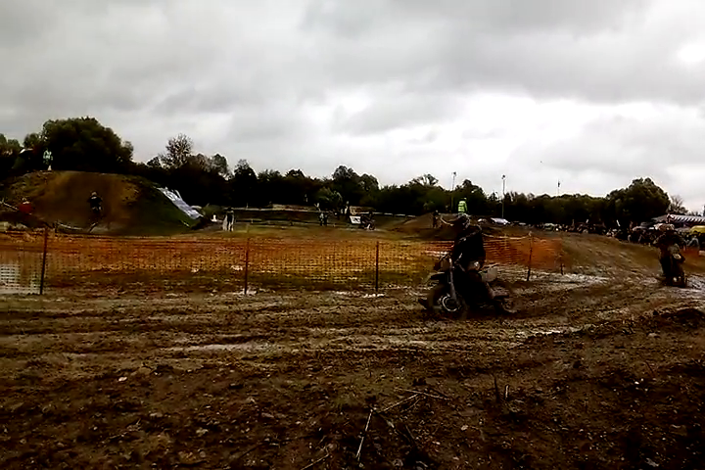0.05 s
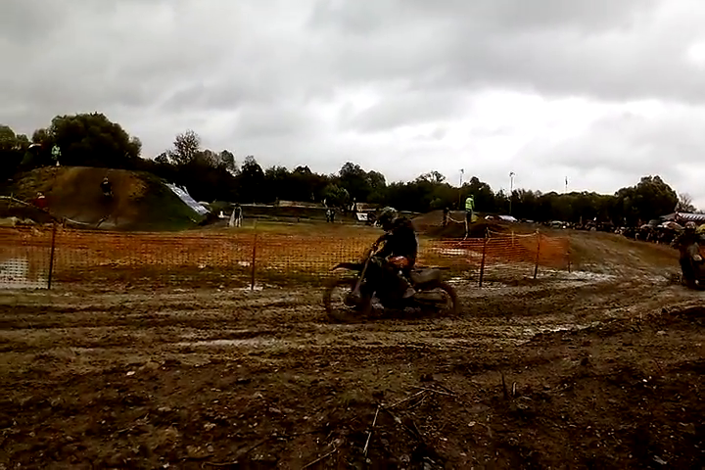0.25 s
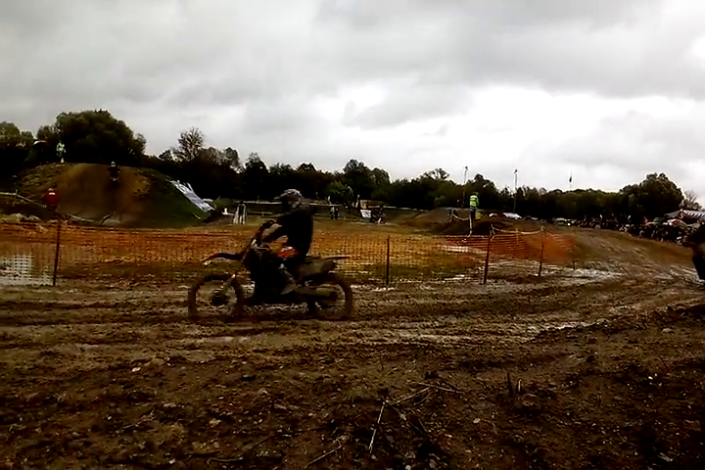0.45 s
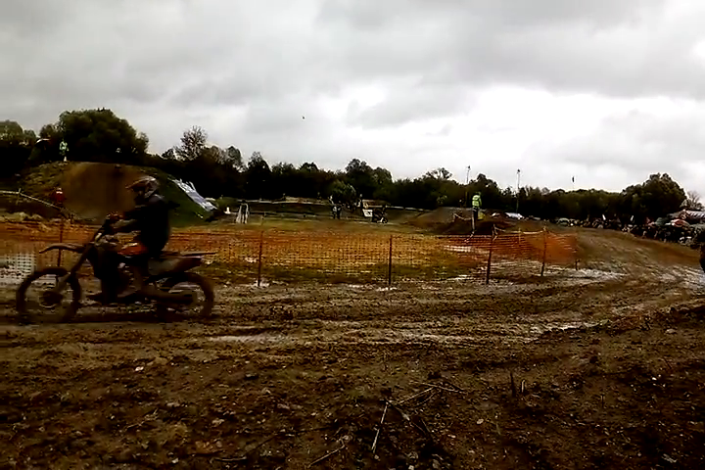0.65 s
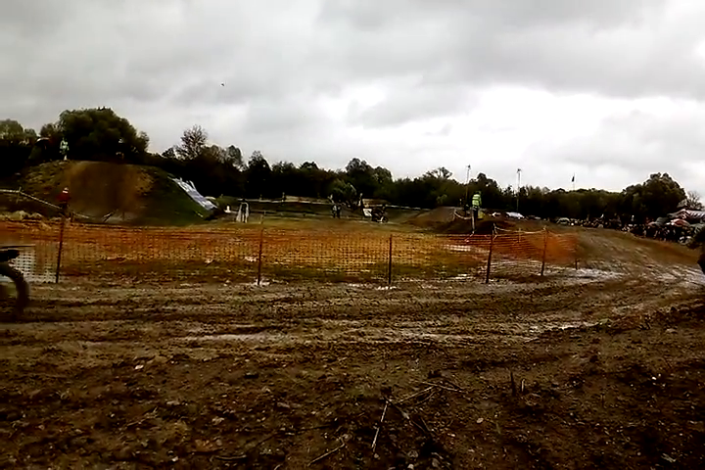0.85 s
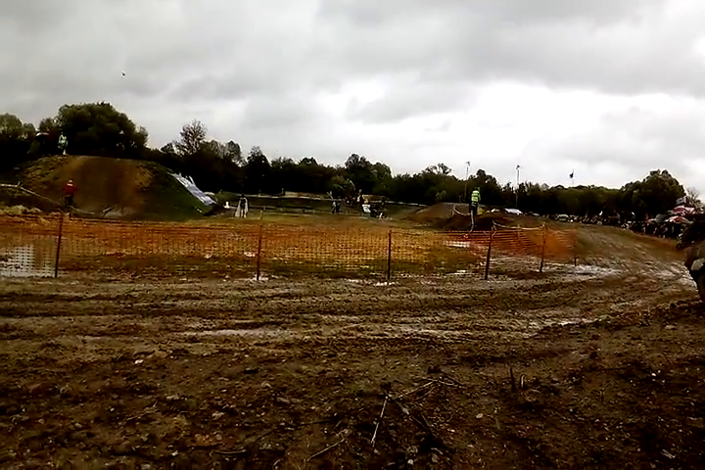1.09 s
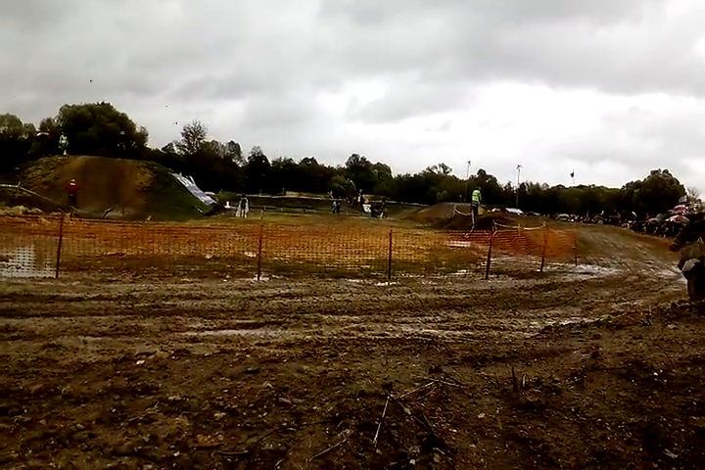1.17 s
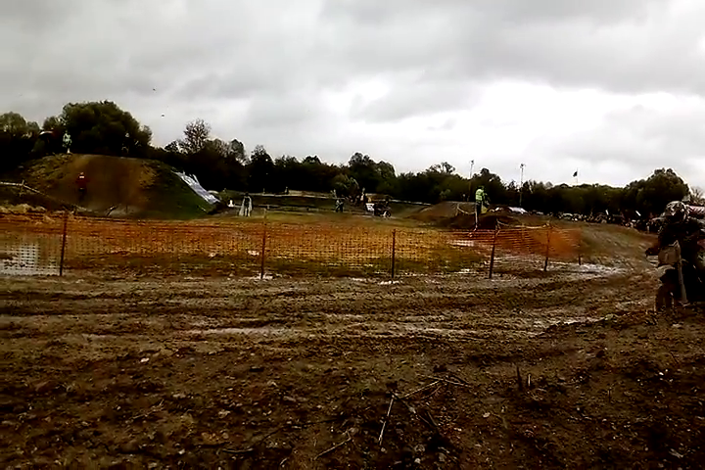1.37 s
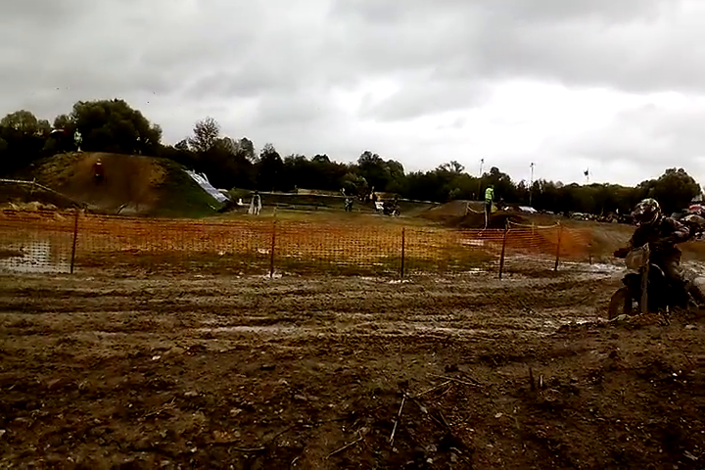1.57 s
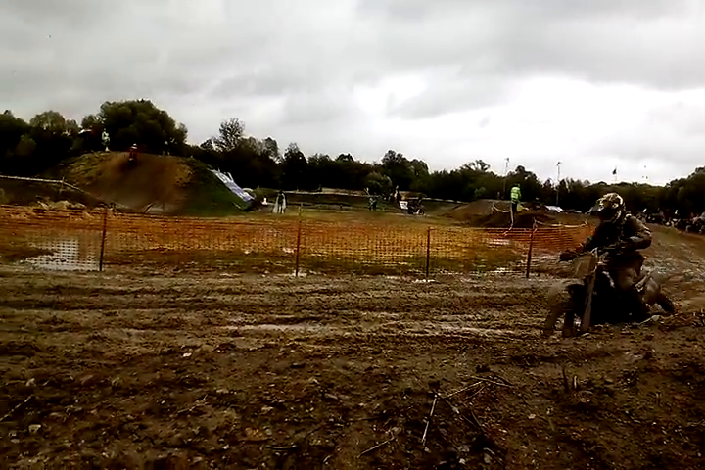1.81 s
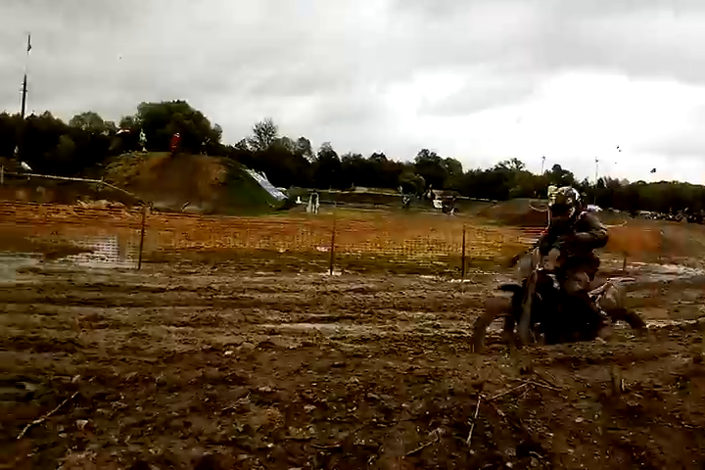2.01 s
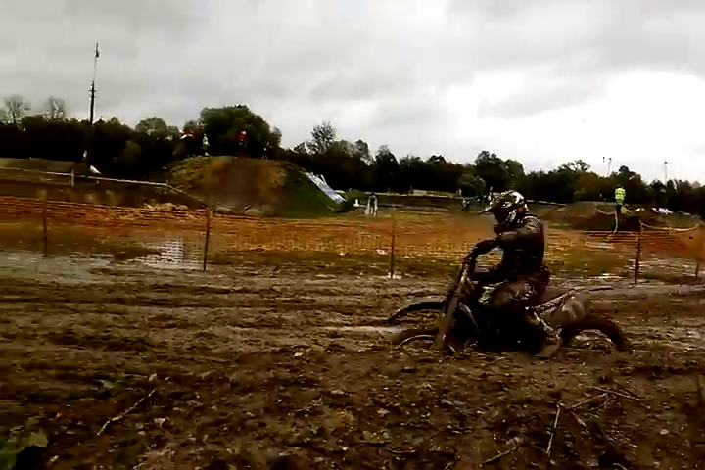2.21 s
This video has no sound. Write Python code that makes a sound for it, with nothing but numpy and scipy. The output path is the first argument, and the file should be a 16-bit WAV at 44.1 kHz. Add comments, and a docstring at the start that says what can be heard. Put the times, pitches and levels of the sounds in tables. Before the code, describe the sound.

Single-cylinder motocross bike roars by and shuts off, followed by another bike's two raspy revs

```python
"""Two single-cylinder dirt bikes on a muddy track. The first drives past close to the microphone and shuts
its throttle; the second comes out of the bend with two blips. Every firing sends out a sharp bark, a low
boom of the silencer and a puff of rasping gas (shaped noise), and the ground and the bikes scatter them.
A bike putters far off, perhaps the second still at a distance, its pulses dulled and smeared; chains and
tyres hiss faintly, and stirred air rumbles on the microphone: both are filtered noise."""
import sys
import numpy as np
from scipy import signal
from scipy.fft import rfft, irfft, next_fast_len
from scipy.io import wavfile
from scipy.ndimage import uniform_filter1d

SR = 44100
rng = np.random.default_rng(int(sys.argv[2]) if len(sys.argv) > 2 else 0)


def to_wav(sig):
    """Store sig (one row per channel, or 1-D mono) as 16-bit WAV at the path in sys.argv[1].

    Samples outside -1..1 are clipped; the rate is SR.
    """
    pcm = np.clip(np.atleast_2d(sig), -1, 1) * 32767
    pcm = np.round(pcm).astype(np.int16)
    wavfile.write(sys.argv[1], SR, pcm.T)  # frames by channels


N = 99225


def amp(db):
    """Decibels to gain."""
    return 10 ** (np.asarray(db) / 20)


def unit(x):
    """Scale to rms 1."""
    return x / np.sqrt(np.mean(x ** 2) + 1e-20)


def curves(rows):
    """One value per sample for each column after the time."""
    s, *cols = np.transpose(rows)
    return [np.interp(np.arange(N) / SR, s, c) for c in cols]


def filtered(x, response):
    """Multiply the spectrum of x by a complex response of frequency."""
    m = 2 * next_fast_len(N // 2 + 8192)
    return irfft(rfft(x, m) * response(np.fft.rfftfreq(m, 1 / SR)), m)[..., :N]


def coloured(x, points):
    """Causal minimum-phase filter through (frequency [Hz], level [dB]) points."""
    def response(hz):
        f, db = np.transpose(points)
        gain = amp(np.interp(np.log(hz + 1), np.log(f + 1), db))
        # folding the cepstrum onto positive times gives the minimum phase
        cep = irfft(np.log(gain))
        cep[1:len(cep) // 2] *= 2
        cep[len(cep) // 2 + 1:] = 0
        return np.exp(rfft(cep))
    return filtered(x, response)


def blend(sounds, moments):
    """Cross-fade sounds, each at its full strength at its moment."""
    t = np.arange(N) / SR
    moments = np.sort(moments)
    return sum(x * np.interp(t, moments, w) for x, w in zip(sounds, np.eye(len(sounds))))


def firings(speed, span, scatter_db, jitter_s):
    """One impulse per firing, each a little different in strength and timing."""
    t = np.arange(N) / SR
    turns = np.cumsum(curves(speed)[0]) / SR  # firings since the start
    first, last = np.interp(span, t, turns)
    times = np.interp(np.arange(first, last), turns, t)
    chance = rng.standard_normal((len(times), 2))
    jittered = times + jitter_s * chance[:, 0]
    at = np.clip(np.round(jittered * SR).astype(int), 0, N - 1)
    return np.bincount(at, amp(scatter_db * chance[:, 1]), N)


def scatter(x, decay_s, count=14):
    """Reflections from ruts and machine: alike for neighbouring firings, changing as the bike moves."""
    t = np.arange(SR // 20) / SR
    tails = rng.standard_normal((count, len(t))) * np.exp(-t / decay_s) * (t > .001)
    tails /= np.linalg.norm(tails, axis=1, keepdims=True)
    reflected = signal.fftconvolve(x[None], tails, axes=1)[:, :N]
    return unit(blend(reflected, np.linspace(0, N / SR, count))) * np.std(x)


def puffs(pulses, rise_s, decay_s, tail_db, tail_s):
    """A burst of turbulence with a longer tail for each impulse, equal to it in energy."""
    t = np.arange(SR // 16) / SR
    fall = np.exp(-t / decay_s) + amp(tail_db) * np.exp(-t / tail_s)
    shape = (1 - np.exp(-t / rise_s)) * fall
    envelope = signal.fftconvolve(pulses, shape / np.linalg.norm(shape))[:N]
    return envelope * rng.standard_normal(N)


def echo(x, delay_s, gain):
    """The pressure wave plus its reflection inside the exhaust."""
    return filtered(x, lambda f: 1 + gain * np.exp(-2j * np.pi * f * delay_s))


def pipe(x, modes, delay_s, high_hz=430):
    """The silencer's low resonances, which sound a moment after the bark."""
    def response(f):
        # each mode: centre c and width w in Hz
        modal = sum(amp(db) * 1j * f * w / (c * c - f * f + 1j * f * w) for c, w, db in modes)
        return np.exp(-2j * np.pi * f * delay_s) * modal
    high_cut = signal.butter(2, high_hz, fs=SR, output="sos")
    return signal.sosfilt(high_cut, filtered(x, response))


def steady(x, span, size=2400):
    """Bring a pulse train to a running rms of 1 over its span."""
    t = np.arange(N) / SR
    on = 1. * ((t > span[0]) & (t < span[1]))

    def smooth(v):
        return np.abs(uniform_filter1d(uniform_filter1d(v, size), size))

    power = smooth(on * x * x) + 1e-6 * np.mean(x * x)
    return x * np.sqrt((smooth(on) + 1e-6) / power)


def exhaust(layers, level, span, trims_db, low_hz=102):
    """Boom, bark and rasp at their levels; the small outlet radiates no deep bass."""
    low_cut = signal.butter(N=7, Wn=low_hz, btype="high", fs=SR, output="sos")
    total = 0
    for x, db, trim in zip(layers, curves(level), trims_db):
        total = total + amp(db + trim) * steady(signal.sosfilt(low_cut, x), span)
    return total


def track_noise():
    """Chains, tyres and the far field: steady coloured noise, faint at the microphone."""
    # colour of the noise: (frequency [Hz], relative level [dB])
    track_colour = [(25, -15), (70, -21), (130, 25.5), (300, 15), (450, 7.5), (750, 7), (1300, 4.5),
                    (2000, -5), (3000, -25), (4500, -9), (5700, -5.5), (6700, -7.5), (7400, -18.5),
                    (8200, -79.5)]
    return amp(-48.5) * unit(coloured(rng.standard_normal(N), track_colour))


def far_bike():
    """A bike at a distance: pulses smeared by strong scatter and dulled into a putter."""
    # engine speed: (time [s], firing rate [1/s])
    far_speed = [(0, 50.5), (.5, 53), (1.3, 52), (2.25, 74)]
    # level at the microphone: (time [s], level [dB])
    far_level = [(0, -52), (.3, -31), (.6, -39.5), (1.2, -43), (1.35, -58), (1.8, -57.5), (2.18, -50),
                 (2.25, -45.5)]
    # dull distant bark: (frequency [Hz], relative level [dB])
    far_colour = [(80, -50.5), (160, 2), (260, 0.5), (430, -7.5), (560, 4.5), (800, 0.5), (1200, -4),
                  (1700, -17), (2600, -66)]
    # the engine fires throughout: (first, last moment [s])
    whole_span = (0, 2.25)
    pulses = firings(far_speed, whole_span, scatter_db=1.0, jitter_s=.0001)
    smeared = pulses + amp(5.5) * scatter(pulses, decay_s=0.0084)
    return amp(curves(far_level)[0]) * unit(coloured(smeared, far_colour))


def wake():
    """Air stirred by a close bike rumbles on the microphone: low noise, strongest at 1 s."""
    # rumble: (time [s], level [dB])
    wake_level = [(0, -60), (.45, -63), (.52, -48), (.85, -49.5), (1.0, -30), (1.1, -48), (1.3, -70),
                  (1.45, -60), (1.56, -66), (1.8, -61), (2.25, -73)]
    # stirred air: (frequency [Hz], relative level [dB])
    wake_colour = [(20, 13.5), (40, -5), (90, 7.5), (130, 12), (300, -76.5)]
    return amp(curves(wake_level)[0]) * unit(coloured(rng.standard_normal(N), wake_colour))


def passing_bike():
    """The exhaust of the close bike changes colour as it shows its front, side and rear."""
    # engine speed: (time [s], firing rate [1/s])
    speed = [(0, 60.5), (.095, 60.5), (.125, 53), (.22, 50.3), (.42, 48), (.521, 49.85), (.573, 57.55),
             (.625, 53.28), (.754, 55.1), (.779, 52.08), (.908, 55.2), (1.037, 72.91), (1.089, 74.07),
             (1.141, 64.32), (1.347, 57.75)]
    # when it is heard: (first, last moment [s])
    span = (.0054, 1.38)
    # exhaust before trims: (time [s], boom level [dB], bark level [dB], rasp level [dB])
    level = [(0.02, -47.5, -37, -62), (0.034, -47.5, -34.5, -67), (0.082, -46, -36, -52.5),
             (0.198, -47.5, -27.5, -43.5), (0.44, -34.5, -32.5, -51.5), (0.47, -37.5, -26.5, -41.5),
             (0.53, -20.5, -20, -36.5), (0.818, -21, -19.5, -43), (1.0, -22.5, -16.5, -39),
             (1.138, -25, -26.5, -46), (1.194, -23, -25, -76.5), (1.266, -44.5, -42.5, -64),
             (1.276, -48, -52, -57), (1.306, -47, -50, -89), (1.352, -47, -59, -96), (1.36, -68, -55, -69)]
    # bark from the front, the side, behind and moving away: (frequency [Hz], relative level [dB])
    bark_front = [(150, -25.5), (400, 4.5), (550, 1.5), (800, 4.5), (1150, 9.5), (1400, -10), (1800, -23.5),
                  (2500, -47.5), (5000, -57.5)]
    bark_side = [(150, -30), (380, -9.5), (500, 1.5), (680, -4.5), (900, -1), (1200, 1.5), (1600, -1),
                 (2050, -25), (3000, -27), (6000, -53)]
    bark_behind = [(150, -36), (440, -20.5), (545, 8), (610, 0), (710, 8.5), (790, 0.5), (900, -2.5),
                   (1170, -4.5), (1400, -6), (1620, 2), (2100, -17.5), (3200, -25.5), (6000, -76)]
    bark_away = [(150, -27.5), (370, -13), (450, -19.5), (540, -13), (680, -7), (880, 2), (1080, 1.5),
                 (1230, 7.5), (1400, -1), (1700, -9.5), (2200, -19), (3500, -19.5), (6000, -69)]
    # moments of the front, side, side, rear and far rear view: (time [s])
    bark_turns = [.38, 0.539, 0.759, 0.958, 1.138]
    # silencer from the side, the rear and drawing away: (frequency [Hz], width [Hz], relative level [dB])
    side_pipe = [(145.8, 16, -9), (210, 28, 4), (323, 47, -9)]
    rear_pipe = [(144.7, 30, 3), (215, 69, -2.5), (301, 23, -13)]
    away_pipe = [(130, 55, -13), (202, 50, 0.5), (310, 18, 0)]
    # moments of the side, rear, rear and far rear view: (time [s])
    pipe_turns = [.9, 1.0, 1.08, 1.17]
    # rasp from the front, the side and behind: (frequency [Hz], relative level [dB])
    rasp_front = [(1000, -10), (1900, 2), (2600, -22.5), (3300, -4), (4300, -1), (5200, 2), (5800, -11),
                  (6600, 0.5), (7400, -15.5), (8200, -52), (10500, -56.5)]
    rasp_side = [(1000, -21.5), (2000, -8), (2700, -1), (3800, -4.5), (5000, 1.5), (5800, -8), (6700, 3),
                 (7400, -14.5), (8200, -79.5), (9500, -25.5), (10500, -40)]
    rasp_behind = [(1000, -12), (2000, -0.5), (2800, -1.5), (3800, 2), (5000, -3), (5800, -5), (6700, -2),
                   (7400, -18), (8200, -48), (10500, -54.5)]
    # moments of the front, side, side and rear view: (time [s])
    rasp_turns = [.42, .52, .76, .98]

    pulses = firings(speed, span, scatter_db=1.02, jitter_s=.00006)
    blast = echo(pulses, delay_s=0.00153, gain=0.19)
    blast = blast + amp(-7.5) * scatter(pulses, decay_s=0.0052)
    blast = blast + amp(-4.5) * puffs(pulses, rise_s=0.00074, decay_s=0.0009, tail_db=-12.5, tail_s=0.013)
    barks = (bark_front, bark_side, bark_behind, bark_away)
    front, side, behind, away = (coloured(blast, c) for c in barks)
    bark = blend([front, side, side, behind, away], bark_turns)

    push = pulses + amp(-9) * puffs(pulses, rise_s=0.0012, decay_s=0.0076, tail_db=-4, tail_s=0.024)
    near, rear, far = (pipe(push, modes, delay_s=0.0017) for modes in (side_pipe, rear_pipe, away_pipe))
    boom = blend([near, rear, rear, far], pipe_turns)

    uneven = pulses * amp(3.0 * rng.standard_normal(N))  # gas varies more than the bark
    gas = puffs(uneven, rise_s=0.00099, decay_s=0.0015, tail_db=-15.5, tail_s=.018)
    front, side, behind = (unit(coloured(gas, c)) for c in (rasp_front, rasp_side, rasp_behind))
    rasp = blend([front, side, side, behind], rasp_turns)
    return exhaust([boom, bark, rasp], level, span, trims_db=[.1, .1, -.3])


def following_bike():
    """The second exhaust: its bark grows brighter as the throttle opens and duller as it eases."""
    # engine speed: (time [s], firing rate [1/s])
    speed = [(1.39, 46.99), (1.443, 59.63), (1.523, 56.01), (1.549, 64.69), (1.629, 66.44), (1.656, 58.69),
             (1.682, 68.27), (1.735, 67.24), (1.762, 56.81), (1.974, 60.05), (2.08, 51.68), (2.106, 56.82),
             (2.212, 45.14)]
    # when it is heard close by: (first, last moment [s])
    span = (1.3904, 2.25)
    # exhaust before trims: (time [s], boom level [dB], bark level [dB], rasp level [dB])
    level = [(1.4, -28, -25.5, -35), (1.436, -20, -25, -38.5), (1.528, -22.5, -24.5, -26),
             (1.534, -22, -12, -27), (1.542, -17, -17.5, -26.5), (1.548, -13, -13.5, -11),
             (1.588, -22.5, -22.5, -40.5), (1.594, -24, -22.5, -35.5), (1.67, -21.5, -22, -30),
             (1.74, -30, -47, -41), (1.776, -48, -48.5, -60), (1.828, -40.5, -57, -77),
             (1.848, -55.5, -76, -93), (1.884, -39, -37, -40), (1.994, -30.5, -36.5, -46.5),
             (2.066, -34.5, -35, -73), (2.146, -52, -41, -52.5), (2.202, -57, -69, -67),
             (2.24, -67, -70, -61)]
    # bark at the first firing of a blip, then with the throttle opening, wide open, easing off
    # and shut: (frequency [Hz], relative level [dB])
    bark_catch = [(200, -23.5), (450, -19.5), (600, -1), (850, -8.5), (1100, -9), (1430, 9.5), (1650, -3),
                  (1870, 4), (2200, -11), (2800, -33), (6000, -44)]
    bark_opening = [(200, -49), (420, 7.5), (580, -13), (900, 13), (1150, 12), (1400, 2.5), (1700, -6.5),
                    (2200, -7), (3000, -39), (6000, -68)]
    bark_open = [(200, -49.5), (450, 5), (560, 1.5), (720, 5.5), (1080, -6), (1400, 8.5), (1620, 5.5),
                 (1850, -3), (2150, -2), (3000, -15.5), (6000, -64.5)]
    bark_easing = [(200, -20), (430, -32), (520, 2.5), (700, 7), (860, -23), (1170, 13.5), (1400, -2),
                   (2000, -4), (2600, -39), (6000, -68)]
    bark_shut = [(200, -34), (450, -18), (680, 4), (880, 2.5), (1060, 13), (1350, -17), (2000, -28),
                 (2600, -60.5), (6000, -53)]
    # moments of catch, opening, opening, open, open, catch, easing and shut: (time [s])
    throttle_turns = [1.394, 1.422, 1.479, 1.538, 1.72, 1.885, 1.95, 2.1]
    # silencer resonances: (frequency [Hz], width [Hz], relative level [dB])
    silencer = [(125, 10, -32.5), (195.2, 13, 6.5), (265.4, 48, 9), (329.8, 22.5, 12)]
    # rasp of the escaping gas: (frequency [Hz], relative level [dB])
    rasp_colour = [(1000, 16), (2100, -2.5), (3000, -2), (3800, 1), (5300, -4), (6200, -12.5), (7000, -17),
                   (8200, -44.5), (10500, -79.5)]

    pulses = firings(speed, span, scatter_db=0.45, jitter_s=.00005)
    blast = echo(pulses, delay_s=0.00131, gain=0.54)
    blast = blast + amp(-10.5) * scatter(pulses, decay_s=0.012)
    blast = blast + amp(-2) * puffs(pulses, rise_s=0.00058, decay_s=.0013, tail_db=-21, tail_s=.016)
    barks = (bark_catch, bark_opening, bark_open, bark_easing, bark_shut)
    catching, opening, wide, easing, shut = (coloured(blast, c) for c in barks)
    throttle = [catching, opening, opening, wide, wide, catching, easing, shut]
    bark = blend(throttle, throttle_turns)

    boom = pipe(pulses, silencer, delay_s=0.00094, high_hz=357)

    gas = amp(-29) * pulses + puffs(pulses, rise_s=0.0024, decay_s=0.001, tail_db=-20.5, tail_s=0.013)
    rasp = coloured(gas, rasp_colour)
    return exhaust([boom, bark, rasp], level, span, trims_db=[.1, .1, -.5])


def scene():
    """The bikes and their wake over the faint noise of the track, nearly mono."""
    mid = track_noise() + passing_bike() + following_bike() + far_bike() + wake()
    # a faint, bright copy 1.2 ms late, opposite in the two channels, gives a little width
    faint = coloured(mid, [(900, -79.5), (2000, -55.5), (3500, -21.5), (7000, -21)])
    side = filtered(faint, lambda f: np.exp(-2j * np.pi * f * .0012))
    return np.array([mid + side, mid - side])


def record(dry):
    """The loudest firings are rounded off below full scale, and the treble drops by 7 dB, then ends."""
    rounded = dry / (1 + np.abs(dry) ** 8) ** (1 / 8)
    top_hz = 10200  # nothing passes above this
    return filtered(rounded, lambda hz: (hz < top_hz) * amp(np.interp(hz, [7400, 8000], [0, -7])))


dry = scene()
out = record(dry)
to_wav(out)
```